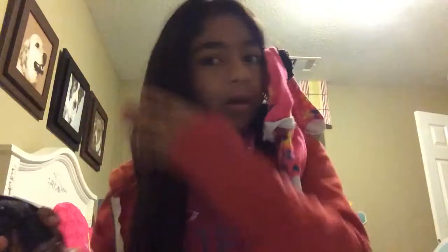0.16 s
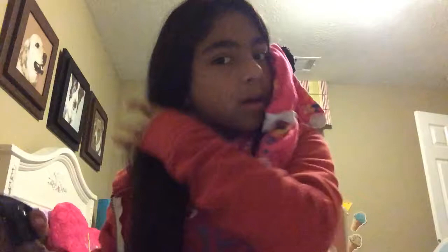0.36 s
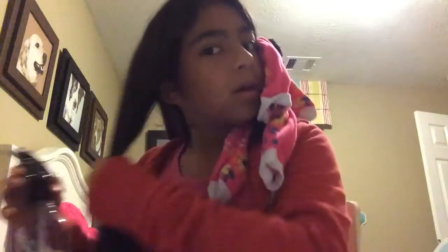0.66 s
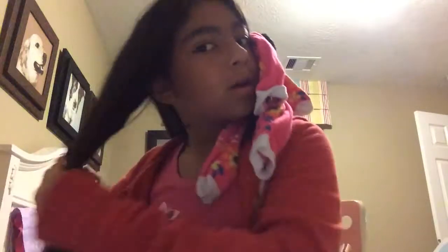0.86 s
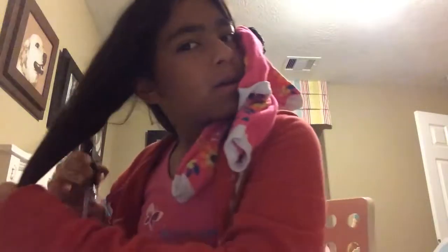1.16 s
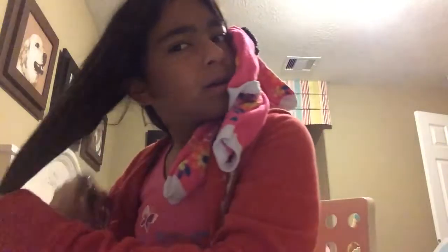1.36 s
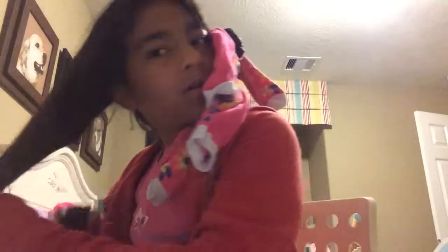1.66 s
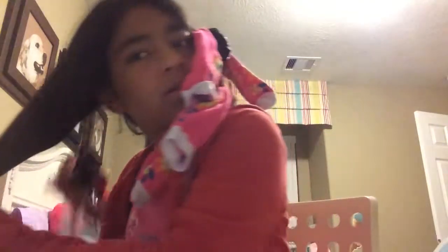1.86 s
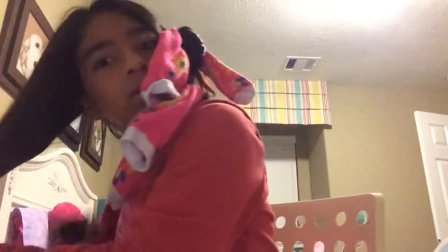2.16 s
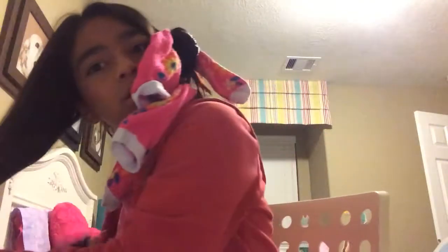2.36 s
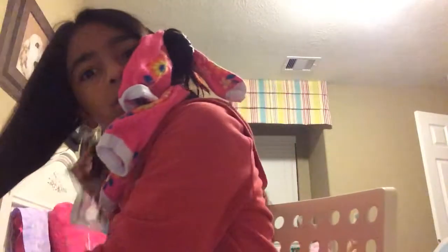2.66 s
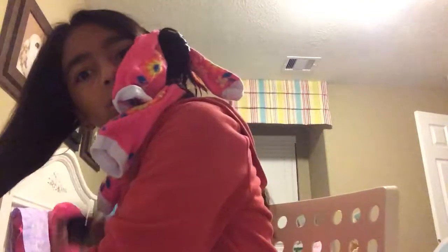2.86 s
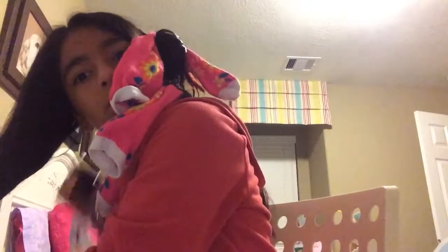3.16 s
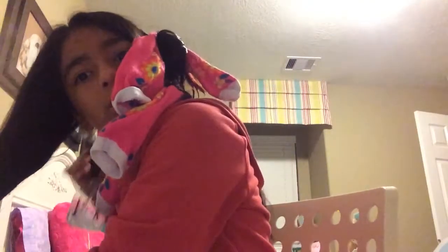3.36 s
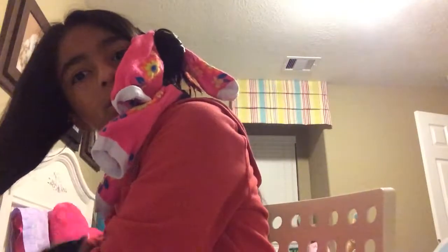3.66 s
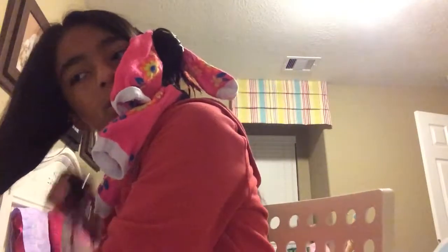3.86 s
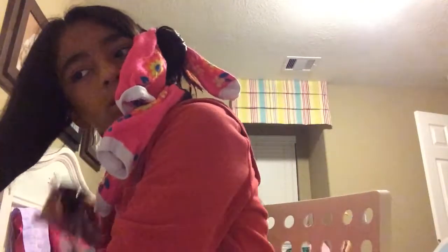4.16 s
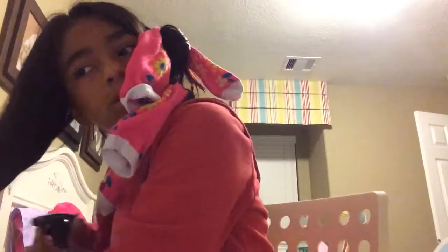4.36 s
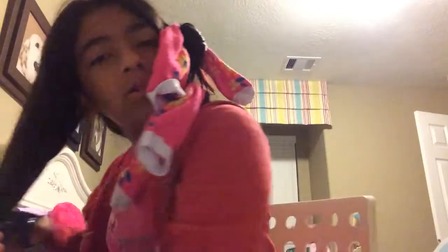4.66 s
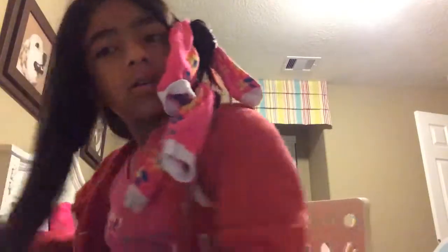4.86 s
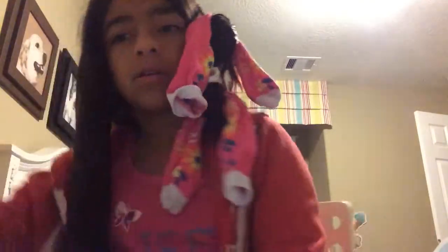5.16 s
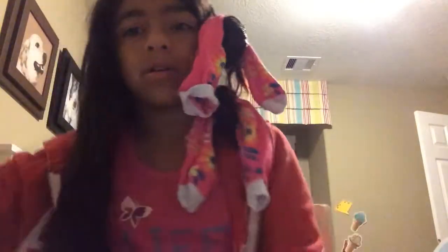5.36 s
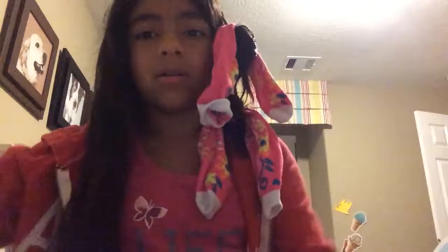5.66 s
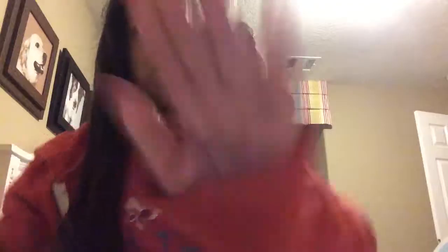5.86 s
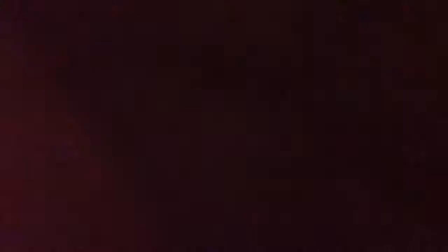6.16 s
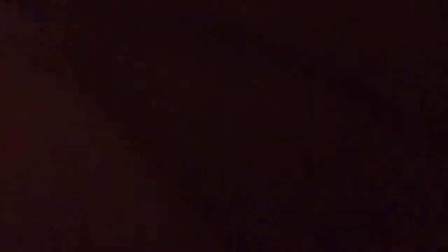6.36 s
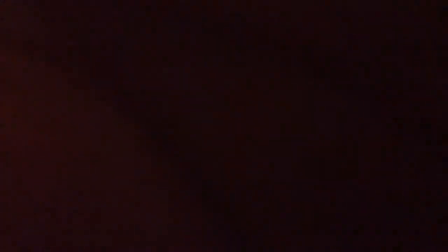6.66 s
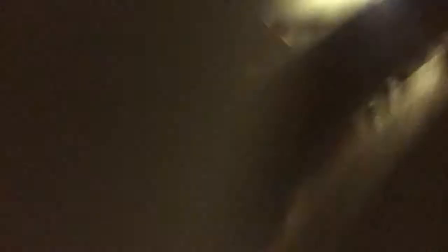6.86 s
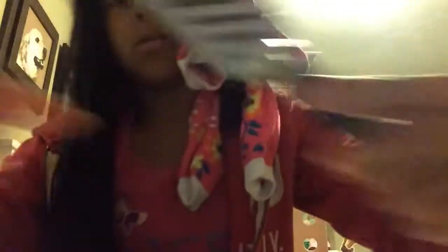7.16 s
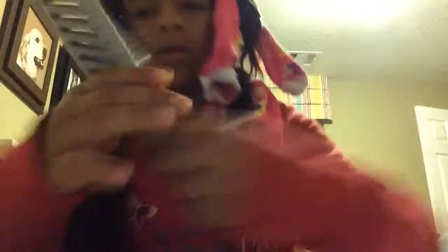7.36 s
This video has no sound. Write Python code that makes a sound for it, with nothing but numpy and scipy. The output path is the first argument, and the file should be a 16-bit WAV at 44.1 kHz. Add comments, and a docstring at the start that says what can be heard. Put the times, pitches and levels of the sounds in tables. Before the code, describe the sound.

In a small, quiet bedroom, a plastic hairbrush rakes long hair in eleven brisk, even strokes, each a hollow tap swelling into a bright hiss, with tiny bristle ticks and one sharp tangle snap. The brush clatters hard onto a desk and rattles. A hand then thumps, rubs and knocks the laptop holding the microphone, and a faint, noisy hum follows before a tiny plastic flick.

```python
"""Brushing long hair beside a laptop

A plastic hairbrush makes eleven quick strokes in a small bedroom: tiny clicks of sliding hair swell into a hiss.
Most strokes begin with a hollow tap of the brush head, and single bristles tick: ringing modes and noise bursts.
The brush clatters onto the desk; a hand bumps, rubs and knocks the laptop: ringing modes, thumps and slides.
Near the end a soft noisy hum around 636 Hz is heard, perhaps the laptop's fan or the room.
A short echo and quiet room noise lie around it all, and the laptop's gain control turns down on loud peaks.
"""
import sys
import numpy as np
from scipy import signal
from scipy.fft import rfft, irfft, next_fast_len
from scipy.io import wavfile
from scipy.ndimage import uniform_filter1d

SR = 44100
rng = np.random.default_rng(int(sys.argv[2]) if len(sys.argv) > 2 else 0)


def store_pcm(level_fs):
    """Save levels as 16-bit WAV."""
    pcm = np.round(np.clip(level_fs, -1, 1) * 32767).astype(np.int16)
    wavfile.write(sys.argv[1], SR, np.atleast_2d(pcm).T)


N = 330617
T = np.arange(N) / SR
RING = T[:SR // 2]  # clock of one short sound, half a second


def amp(db):
    """Turn decibels into gain."""
    return 10 ** (np.asarray(db) / 20)


def unit(x):
    """Scale to an average strength (rms) of 1."""
    return x / np.sqrt(np.mean(x ** 2))


def add(out, s, x):
    """Mix x into out from time s [s]."""
    i = max(int(s * SR), 0)
    out[i:i + len(x)] += x[:len(out) - i]


def colour(x, points, peak=None):
    """Shape the tone of x by (pitch [Hz], level [dB]) points and one optional resonance (Hz, width Hz, dB)."""
    size = next_fast_len(len(x))
    f = np.maximum(np.arange(size // 2 + 1) * SR / size, 1)
    hz, db = np.transpose(points)
    curve = np.interp(np.log(f), np.log(np.sort(hz)), db)
    if peak is not None:
        peak_hz, width_hz, peak_db = peak
        curve = curve + peak_db / (1 + (2 * (f - peak_hz) / width_hz) ** 2)
    return irfft(rfft(x, size) * amp(curve), size)[:len(x)]


def keep_below(x, hz):
    """Keep the part of x below a pitch, without shifting it in time."""
    return signal.sosfiltfilt(signal.butter(6, hz, fs=SR, output="sos"), x)


def registers(x):
    """Split a sound into low, middle and top parts, each scaled to rms 1."""
    low, below_top = keep_below(x, 2400), keep_below(x, 8200)
    return unit(low), unit(below_top - low), unit(x - below_top)


def slips(size, per_s, spread_db):
    """Make a train of tiny clicks at random moments and of very unequal strength."""
    happens = rng.random(size) < per_s / SR
    return happens * rng.standard_normal(size) * amp(spread_db * rng.standard_normal(size))


def flutter(size, per_s):
    """Make random wavering with a spread near 1: straight lines between random points."""
    place = np.arange(size) * per_s / SR
    return np.interp(place, np.arange(size), rng.standard_normal(size))


def fade(t60, rise=0.00093):
    """Rise quickly and roundly, then die away by 60 dB in t60 [s]."""
    return (1 - np.exp(-(RING / rise) ** 2)) * np.exp(-np.log(1000) * RING / t60)


def ring(modes, detune):
    """Let each mode build up within a cycle and ring out, each slightly detuned at random."""
    rings = []
    for hz, db, t60 in modes:
        cycles = hz * (1 + detune * rng.standard_normal()) * RING
        build_up = 1 - np.exp(-(2 * cycles) ** 2)
        rings.append(amp(db) * build_up * fade(t60) * np.sin(2 * np.pi * cycles))
    return np.array(rings)


def slide(grain, times, levels_db, rise_db, fall_db, flatness, waver_db):
    """Swell and sink in an arch, as friction does with speed; each register wavers on its own."""
    start, loudest, end = times
    age = T[:len(grain)]
    before = np.maximum(loudest - start - age, 0) / max(loudest - start, 1 / SR)
    after = np.maximum(start + age - loudest, 0) / max(end - loudest, 1 / SR)
    out = 0
    for part, db, power in zip(registers(grain), levels_db, flatness):
        arch_db = -rise_db * before ** power - fall_db * after ** power
        waver = waver_db * flutter(len(grain), per_s=47.6)
        out = out + part * amp(db + arch_db + waver)
    return out * np.minimum(age / .004, 1)  # ease in over 4 ms


# colour of the quiet room: (pitch [Hz], level relative to the other points [dB])
ROOM_TONE = [(15, -39.5), (25, -17), (48, -4), (157, -5), (185, -4.5), (223, -10), (317, -17.5), (344, -16),
             (405, -13), (545, -18), (624, -14), (818, -21), (7920, -31), (14000, -35), (16000, -46)]
ROOM_DB = -66


def room_air():
    """Quiet rumble and hiss of the room: coloured noise that wavers slightly."""
    noise = unit(colour(rng.standard_normal(N), ROOM_TONE))
    return amp(ROOM_DB) * noise * amp(0.24 * flutter(N, per_s=7.3))


# colour of flicking bristles: (pitch [Hz], level within its register [dB])
BRISTLE_COLOUR = [(120, -43), (350, -17.5), (700, -5), (1200, 8.5), (2000, 0.5), (3500, 8), (4500, 3),
                  (6200, 4.5), (8500, -4.5), (11000, -6), (16000, -27)]


def bristle_burst(t60, low_db, mid_db, top_db):
    """A few stiff bristles flick almost at once: a short noise burst whose low part starts soonest."""
    low, mid, top = registers(colour(rng.standard_normal(len(RING)), BRISTLE_COLOUR))
    bright = amp(mid_db) * mid + amp(top_db) * top
    return fade(t60, rise=0.00036) * amp(low_db) * low + fade(t60, rise=0.0011) * bright


# single bristles snap free and plastic ticks in the fingers:
# (time [s], low level [dB], middle level [dB], top level [dB])
TICKS = [(0.013, -46.5, -53.5, -59), (0.07, -53, -54, -60), (0.2049, -52.5, -60, -80),
         (0.4372, -60.5, -61, -76), (0.8968, -57, -64, -82), (0.9299, -41.5, -55, -66),
         (1.136, -55, -55, -40), (1.1756, -41, -79, -68), (2.173, -54.5, -45, -55), (2.41, -47, -43, -38.5),
         (2.7846, -53, -45, -69), (2.81, -43.5, -50, -66), (4.132, -66, -54, -59),
         (4.429, -56.5, -49.5, -49), (4.6853, -47, -53.5, -68), (4.7694, -52, -61, -63),
         (4.8518, -55, -57.5, -62), (5.9837, -46.5, -49.5, -76), (6.2963, -45, -51, -74),
         (6.8697, -51, -49, -62), (7.002, -48.5, -68, -79)]


def bristle_ticks():
    """Each tick is one short bristle burst with its own mix of low, middle and top."""
    out = np.zeros(N)
    for s, low_db, mid_db, top_db in TICKS:
        add(out, s, bristle_burst(0.034, low_db, mid_db, top_db))
    return out


def bedroom(x, t60):
    """Short, soft echo of a furnished room: fading noise stands in for many reflections."""
    tail_colour = [(60, -8.5), (200, -9.0), (1500, -6.5), (5000, -8.0), (15000, -10.0)]
    tail = colour(rng.standard_normal(len(RING)), tail_colour)
    tail = tail * fade(t60) * (1 - np.exp(-RING / 0.0024))
    return signal.fftconvolve(x, tail / np.sqrt(np.sum(tail ** 2)))[:N]


PLACE_SCATTER_DB = 2.5  # each blow lands on another spot and wakes the modes differently


def knocks(modes, blows, detune, boom_lag_s, thud_lag_s, crack_db, crack_t60, crack_colour, grip_db_per_s):
    """Blows make four families of modes ring, with a noisy crack; the heavy, low ones answer late."""
    out = np.zeros(N)
    family = np.searchsorted([300, 850, 1900], np.transpose(modes)[0])  # boom, thud, clack, crack
    for s, *force_db in blows:
        scatter_db = PLACE_SCATTER_DB * rng.uniform(-1, 1, (len(modes), 1))
        # the grip shortens every ring
        rings = ring(modes, detune) * amp(scatter_db - grip_db_per_s * RING)
        for k, lag in enumerate((boom_lag_s, thud_lag_s, 0, 0)):
            add(out, s + lag, amp(force_db[k]) * rings[family == k].sum(0))
        crack = unit(colour(rng.standard_normal(len(RING)), crack_colour)) * fade(crack_t60, rise=0.0004)
        add(out, s, amp(force_db[-1] + crack_db) * crack)
    return out


RATTLE_GAP_S, RATTLE_DROP_DB = .0095, 24  # average time between bounces; loss of force over a rattle's length


def bounces(rattles, scatter_db, count):
    """A rattle is a run of uneven little blows that hold their force for a while, then die quickly."""
    blows = []
    for s, length, *force_db in rattles:
        gaps = RATTLE_GAP_S * rng.uniform(.7, 1.3, count)
        ages = np.cumsum(gaps) - gaps[0]
        for age, luck in zip(ages, rng.standard_normal((count, 4))):
            drop_db = RATTLE_DROP_DB * (age / length) ** 3
            blows.append((s + age, *(force_db + scatter_db * luck - drop_db)))
    return blows


# laptop shell: (pitch [Hz], level [dB], time to fade by 60 dB before the grip damps it [s])
SHELL_MODES = [(118.2, -10, 0.18), (209, -24, 0.075), (410, -10.5, 0.014), (413.4, 3.5, 0.066),
               (473, -22, 0.09), (564, -7.5, 0.037), (636, -7.5, 0.033), (717, -28, 0.019),
               (890, 3.5, 0.016), (1082, 2.5, 0.012), (1426, -9, 0.018), (1710, -20.5, 0.034),
               (2350, -8.5, 0.02), (3300, -30.5, 0.016), (4300, -10, 0.015)]
# bumps on the shell: (time [s], boom force [dB], thud force [dB], clack force [dB], crack force [dB])
SHELL_BLOWS = [(0.292, -34.5, -38, -74, -76), (0.497, -32.5, -40.5, -76, -72), (0.945, -35, -42, -64, -70),
               (6.4249, -24, -12, -15, -25), (6.4582, -55, -23, -22.5, -39.5),
               (6.642, -49, -26.5, -23.5, -45), (6.731, -50, -36.5, -59, -63)]
# the laptop chatters on the desk:
# (time [s], length [s], boom force [dB], thud force [dB], clack force [dB], crack force [dB])
SHELL_RATTLES = [(6.478, 0.035, -38, -28.5, -37, -58), (6.753, 0.018, -47, -46, -29.5, -42)]
# noisy crack of a blow on the shell: (pitch [Hz], level relative to the other points [dB])
SHELL_CRACK = [(40, -21), (200, -7), (1000, 9), (2200, -7), (4500, -16), (7000, -36), (15000, -44)]


def laptop_knocks():
    """A hand bumps the laptop: its shell modes ring briefly, and some bumps rattle on."""
    blows = SHELL_BLOWS + bounces(SHELL_RATTLES, scatter_db=2.5, count=4)
    return knocks(SHELL_MODES, blows, detune=0.034, boom_lag_s=0.0041, thud_lag_s=0.0019,
                  crack_db=0.5, crack_t60=0.039, crack_colour=SHELL_CRACK, grip_db_per_s=32)


# knotted strands tear apart:
# (start [s], peak [s], end [s], low level [dB], middle level [dB], top level [dB])
RIPS = [(0.942, 0.967, 0.984, -69, -44.5, -33), (0.978, 1.006, 1.016, -48, -61, -34.5)]


def tearing():
    """Knotted strands give way in a short spray of bright, separate clicks."""
    out = np.zeros(N)
    for start, peak, end, *levels_db in RIPS:
        clicks = slips(SR // 10, per_s=1700, spread_db=3)
        grain = colour(clicks, [(500, -3), (1500, -5), (8000, -1.5), (15000, 7)])
        add(out, start, slide(grain, (start, peak, end), levels_db, rise_db=23, fall_db=15,
                              flatness=(1.6, 1.6, 1.6), waver_db=1.0))
    return out


# colour of sliding hair: (pitch [Hz], level within its register [dB])
HAIR_COLOUR = [(150, -51), (400, -13), (600, -10.5), (850, -8), (1130, 3), (1480, -1), (1900, 1), (2600, 0),
               (5000, 0), (7900, 0.5), (8200, -3.5), (11000, -3.5), (13500, -8.5), (16000, -22.5)]


def hair_grain(sheen, air_db):
    """Hundreds of strands stick and slip on the bristles, catching in small bunches."""
    size = SR // 2
    bunching = amp(.9 * flutter(size, per_s=160))
    grain = slips(size, per_s=22000, spread_db=1.2) * bunching
    return colour(colour(grain, HAIR_COLOUR, sheen), [(10500, 0), (15000, air_db)])


# one pull of the brush: (lands [s], lets go [s], share of the pull at which it is fastest,
# hiss level [dB], drone level above hiss [dB], sizzle level above hiss [dB],
# settling hair level [dB], parting tick level [dB])
STROKES = [(0.948, 1.18, 0.43, -39, -4, -2.5, -62.5, -50),
           (1.268, 1.485, 0.54, -37, -8, -6.5, -59.5, -53.5),
           (1.582, 1.799, 0.53, -39.5, -7, -8.5, -55.5, -53.5),
           (1.901, 2.128, 0.56, -39.5, -5, -1.5, -59.5, -52.5),
           (2.212, 2.455, 0.56, -41.5, -9, -7, -58.5, -69), (2.538, 2.77, 0.46, -41, -7, -2, -60, -56),
           (2.844, 3.097, 0.47, -40.5, -11, -5, -64, -58), (3.184, 3.421, .48, -39, -9, -4, -58, -58),
           (3.504, 3.755, 0.44, -38, -12.5, -6, -59, -56),
           (3.838, 4.074, 0.44, -39, -8.5, -2.5, -59, -49.5),
           (4.165, 4.414, 0.47, -34.5, -13.5, -4, -66, -68)]
# the taut strands favour one band in each stroke: (pitch [Hz], width [Hz], level [dB], airy top level [dB])
SHEEN = [(3800, 1700, 5, 11), (3360, 640, 4, 6), (5700, 3500, 0.5, -3), (4700, 6800, 22, 11.5),
         (5260, 2500, 4.5, -2), (4150, 7500, 11, 10), (5800, 3800, 3, -2), (4530, 3600, 1.5, 8),
         (6260, 2500, 4, -4), (5600, 3000, -1, 5), (7000, 10800, 12.5, 2)]
PULL_RISE_DB, PULL_FALL_DB = 29, 39.5  # the hiss lies this far under its peak at landing and at letting go
# shape of the swell, higher is flatter on top: (drone power, hiss power, sizzle power)
PULL_FLATNESS = (5, 3.09, 3.06)
SETTLE_RISE_S, SETTLE_DB_PER_S = .03, 205  # freed hair swings back and comes to rest
# mix of the settling hair: (low level [dB], middle level [dB], top level [dB])
SETTLE_COLOUR_DB = (-3, -3, -9.5)


def brushing():
    """Each pull swells and slows; the last bristles let go with a tick and the hair falls back."""
    out = np.zeros(N)
    settle_drop_db = SETTLE_DB_PER_S * np.maximum(RING - SETTLE_RISE_S, 0)
    settling = np.minimum(RING / SETTLE_RISE_S, 1) * amp(-settle_drop_db)
    for stroke, (*sheen, air_db) in zip(STROKES, SHEEN):
        lands, lets_go, share, hiss_db, drone_db, sizzle_db, settle_db, tick_db = stroke
        times = lands, lands + share * (lets_go - lands), lets_go
        levels_db = hiss_db + drone_db, hiss_db, hiss_db + sizzle_db
        pull = slide(hair_grain(sheen, air_db), times, levels_db,
                     PULL_RISE_DB, PULL_FALL_DB, PULL_FLATNESS, waver_db=0.93)
        add(out, lands, pull)
        loose = amp(SETTLE_COLOUR_DB) @ np.array(registers(hair_grain(None, air_db=-7)))
        add(out, lets_go - SETTLE_RISE_S, amp(settle_db) * settling * loose)
        add(out, lets_go, amp(tick_db) * bristle_burst(t60=0.028, low_db=-3, mid_db=3.5, top_db=5.0))
    return out


# soft thumps that reach the microphone through the desk:
# (time of the middle [s], pitch [Hz], time from the middle until 11 dB weaker [s], level [dB])
THUMPS = [(1.153, 122, 0.037, -54.5), (1.339, 111, 0.0019, -37), (1.63, 130, 0.027, -56),
          (1.785, 128, 0.023, -57), (2.706, 143, 0.012, -48), (2.723, 95, 0.019, -45.5),
          (5.68, 167, 0.016, -57), (5.783, 102, 0.011, -33), (5.819, 111, 0.018, -42.5),
          (5.865, 151, 0.044, -53.5), (5.949, 120, 0.015, -39), (5.988, 111, 0.031, -48),
          (6.089, 103, 0.016, -30), (6.101, 80, 0.016, -26.5), (6.13, 136.6, 0.011, -43),
          (6.302, 105, 0.016, -36), (6.346, 167, 0.0086, -48.5), (6.68, 124.8, 0.089, -51.5),
          (6.765, 87, 0.0015, -29.5)]


def thumps():
    """Soft, slow pushes rock the laptop for a few cycles, with a dull rumble of the contact."""
    out, t = np.zeros(N), RING - RING.mean()
    rumble_colour = [(30, 8), (80, 17), (220, 8.5), (400, -12), (900, -26), (3000, -78)]
    for s, hz, length, db in THUMPS:
        rumble = unit(colour(rng.standard_normal(len(t)), rumble_colour))
        rocking = np.cos(2 * np.pi * hz * t) + amp(-8.0) * rumble
        swell = 1 / np.cosh(np.clip(1.93 * t / length, -20, 20))
        add(out, s + t[0], amp(db) * rocking * swell)
    return out


# hollow brush head: (pitch [Hz], level within its family [dB], time to fade by 60 dB before damping [s])
BRUSH_MODES = [(490, 3, 0.045), (516, 16, 0.054), (678, 26, 0.16), (773, -34, 0.09), (1130, -12, 0.12),
               (1212, 4, 0.037), (1516, -0.5, 0.026), (3500, -12, 0.027), (6160, 5, 0.0094)]
# the brush head taps against hair and hand:
# (time [s], low modes level [dB], middle modes level [dB], high modes level [dB], bristles level [dB])
LANDINGS = [(1.269, -37, -40, -32.5, -39), (1.582, -39.5, -47.5, -40.5, -45),
            (1.899, -43, -47.5, -38.5, -42), (2.21, -46.5, -54, -44, -54), (2.45, -56, -44, -48, -44.5),
            (2.539, -52, -40, -40, -39.5), (2.846, -48, -46.5, -45, -46.5), (3.186, -64, -46, -37, -53),
            (3.453, -64, -46.5, -42, -44), (3.501, -48, -41.5, -39, -42), (3.84, -49, -40, -37.5, -42.5),
            (4.164, -44, -43.5, -32.5, -46)]
TAP_DAMPING_T60_S = .05  # extra fading


def brush_taps():
    """The hollow head rings when pushed, soon smothered by hair and fingers, and the bristles flick."""
    out, push_size = np.zeros(N), SR // 100
    family = np.searchsorted([600, 950], np.transpose(BRUSH_MODES)[0])  # low, middle, high
    for s, *head_db, bristle_db in LANDINGS:
        # the rows of bristles touch one after another, which spreads the push
        push = slips(push_size, per_s=9900, spread_db=9.0) * fade(0.028, rise=0.0006)[:push_size]
        rings = ring(BRUSH_MODES, detune=0.042)
        modes = signal.fftconvolve(rings, push[None], axes=1)[:, :len(RING)]
        for k, db in enumerate(head_db):
            tap = modes[family == k].sum(0) * fade(TAP_DAMPING_T60_S)
            add(out, s, amp(db) * tap / np.abs(tap).max())
        add(out, s, amp(bristle_db) * bristle_burst(t60=0.037, low_db=-5, mid_db=0.0, top_db=-7.0))
    return out


# a tangle gives way: (time [s], pluck pitch [Hz], pluck level [dB], snap level [dB])
SNAGS = [(1.3337, 473, -23.5, -18.5), (1.3361, 470, -47, -21)]


def tangle_snap():
    """A tangle gives way with a short plucked tone and a very brief bristle burst."""
    out = np.zeros(N)
    for s, hz, pluck_db, snap_db in SNAGS:
        add(out, s, amp(pluck_db) * fade(0.019) * np.sin(2 * np.pi * hz * RING))
        add(out, s, amp(snap_db) * bristle_burst(t60=.005, low_db=0, mid_db=0, top_db=-6))
    return out


# desk with the brush on it: (pitch [Hz], level [dB], time to fade by 60 dB before the grip damps it [s])
DESK_MODES = [(87.5, -16, 0.25), (131.4, -9.5, 0.21), (234.7, -9.5, 0.18), (330, -15.5, .06),
              (417.4, 0.5, 0.08), (471.5, -2.5, 0.064), (640, -15, 0.073), (798, -20.5, 0.052),
              (961, -4.5, .035), (1184, -13, 0.081), (1287, -14, .05), (1356, -4, 0.041), (1430, -3, 0.031),
              (1610, -15.5, 0.057), (1820, -15.5, 0.037), (2040, -3, 0.02), (2360, -5.5, .022),
              (2640, 0, 0.024), (2740, -0.5, .02), (3150, -10.5, .02), (3550, -9.5, 0.033),
              (3970, -8, 0.023), (4660, -5, 0.011)]
# the brush is put down on the desk:
# (time [s], boom force [dB], thud force [dB], clack force [dB], crack force [dB])
DESK_BLOWS = [(5.281, -27, -38, -27.5, -56), (5.294, -13, -15.5, -5, -19.5),
              (5.309, -8.5, -14.5, -15, -28.5), (5.5073, -43, -30, -33, -52),
              (5.519, -27, -25.5, -21.5, -38.5), (5.526, -34, -41, -27.5, -58)]
# it rattles before it lies still:
# (time [s], length [s], boom force [dB], thud force [dB], clack force [dB], crack force [dB])
DESK_RATTLES = [(5.333, 0.069, -23, -37.5, -25, -40), (5.546, 0.061, -49, -44, -37, -52.5)]
# noisy crack of a blow on the desk: (pitch [Hz], level relative to the other points [dB])
DESK_CRACK = [(40, -15), (120, 23), (450, 1), (800, -12), (1400, 5), (2600, 0), (4200, -10), (6000, -13),
              (10000, -23.5), (15000, -40)]


def desk_clatter():
    """The brush lands on the desk: blows and rattles make the desk modes ring, strongly damped."""
    blows = DESK_BLOWS + bounces(DESK_RATTLES, scatter_db=1.5, count=8)
    return knocks(DESK_MODES, blows, detune=0.023, boom_lag_s=0.0056, thud_lag_s=.007,
                  crack_db=5.5, crack_t60=0.048, crack_colour=DESK_CRACK, grip_db_per_s=200)


# palm and sleeve slide over the laptop; the last rows, from 6.929 s on, are a steady hum near 636 Hz,
# perhaps its fan or the room; an end before the loudest moment means a sudden stop:
# (start [s], loudest [s], end [s], low level [dB], middle level [dB], top level [dB],
# resonance pitch [Hz], resonance width [Hz], resonance level [dB])
SLIDES_AND_HUM = [(5.647, 5.66, 5.72, -60.5, -81, -87, 1670, 1200, -9),
                  (5.871, 5.97, 6.4, -63.5, -72, -72, 1690, 1200, -6.5),
                  (5.991, 6.026, 6.15, -54, -62.5, -85, 1750, 600, 12),
                  (6.09, 6.11, 6.08, -53, -45.5, -47.5, 7500, 3120, 6.5),
                  (6.108, 6.203, 6.21, -49, -45.5, -46.5, 7760, 3000, 7),
                  (6.139, 6.143, 6.16, -37, -51, -62, 1400, 1100, 12),
                  (6.221, 6.248, 6.28, -48, -50, -61, 1670, 1200, 2),
                  (6.277, 6.315, 6.44, -57, -65, -67.5, 635, 250, 12),
                  (6.516, 6.55, 6.615, -60, -64, -71, 600, 442, 7),
                  (6.692, 6.761, 6.76, -59.5, -61, -65, 1050, 650, 2),
                  (6.806, 6.87, 6.93, -65, -73, -67.5, 636, 720, 9),
                  (6.929, 7.065, 7.14, -57.5, -63.5, -66.5, 636, 720, 13),
                  (7.128, 7.21, 7.5, -67.5, -94, -92.5, 636, 720, 18)]
# colour of the rubbing and the hum before the resonance: (pitch [Hz], level within its register [dB])
RUB_COLOUR = [(150, 4), (350, -2), (600, 2), (900, 2), (1500, 4), (2500, 0.5), (4500, -2.5), (7500, -6),
              (9000, -13.5), (12000, -14.5), (16000, -32.5)]
SLIDE_EDGE_DB = 10.5  # loss at both ends of a row


def rubbing_and_hum():
    """Skin and cloth drag in tiny, uneven slips; the late hum is the same grain through a 636 Hz resonance."""
    out, size = np.zeros(N), SR // 2
    for start, loudest, end, low_db, mid_db, top_db, *resonance in SLIDES_AND_HUM:
        unevenness = amp(1.2 * flutter(size, per_s=90))
        grain = slips(size, per_s=12000, spread_db=1.5) * unevenness
        sound = slide(colour(grain, RUB_COLOUR, resonance), (start, loudest, end), (low_db, mid_db, top_db),
                      SLIDE_EDGE_DB, SLIDE_EDGE_DB, flatness=(2, 2.1, 1.4), waver_db=0.35)
        add(out, start, sound)
    return out


# thin plastic edge: (pitch [Hz], level [dB], time to fade by 60 dB [s])
EDGE_MODES = [(2670, -23.5, 0.011), (5170, -6, 0.0088), (7330, 3.5, 0.0065), (8300, -6.5, 0.011),
              (10700, -11, 0.01)]
# its single flick: (time [s], level [dB])
EDGE_FLICK = (7.486, -27)


def edge_flick():
    """A fingernail flicks a thin plastic edge, whose high modes ring very briefly."""
    out = np.zeros(N)
    s, db = EDGE_FLICK
    add(out, s, amp(db) * ring(EDGE_MODES, detune=.005).sum(0))
    return out


def scene():
    """Mix brush, desk, laptop and hum, with an echo of the contacts, over the quiet noise of the room."""
    air = room_air()
    contacts = bristle_ticks() + brush_taps() + tangle_snap()
    shell = laptop_knocks()
    hair = tearing() + brushing()
    desk = desk_clatter()
    to_room = amp(-15) * hair + amp(-8) * contacts + amp(-13.5) * desk + amp(-19.5) * shell
    echo = bedroom(to_room, t60=0.18)
    return (hair + contacts + desk + shell + thumps() + rubbing_and_hum() + edge_flick() + echo + air)[None]


TOP_HZ = 15700  # nearly nothing passes above this


def record(dry, threshold_db=-19, squeeze=0.25, release_db_per_s=32, bass_hz=42):
    """The microphone sheds deep bass; gain control dips on loud peaks and recovers slowly; the top is cut."""
    x = signal.sosfilt(signal.butter(2, bass_hz, "high", fs=SR, output="sos"), dry)
    peak_db = 20 * np.log10(np.abs(x[0]) + 1e-9)
    # remember the loudest peak, letting it sink steadily
    held_db = np.maximum.accumulate(peak_db + release_db_per_s * T) - release_db_per_s * T
    excess_db = uniform_filter1d(np.maximum(held_db - threshold_db, 0), size=64)
    gain = amp(-squeeze * excess_db)
    return signal.sosfilt(signal.ellip(10, .2, 80, TOP_HZ, fs=SR, output="sos"), x * gain)


dry = scene()
out = record(dry)
store_pcm(out)
```